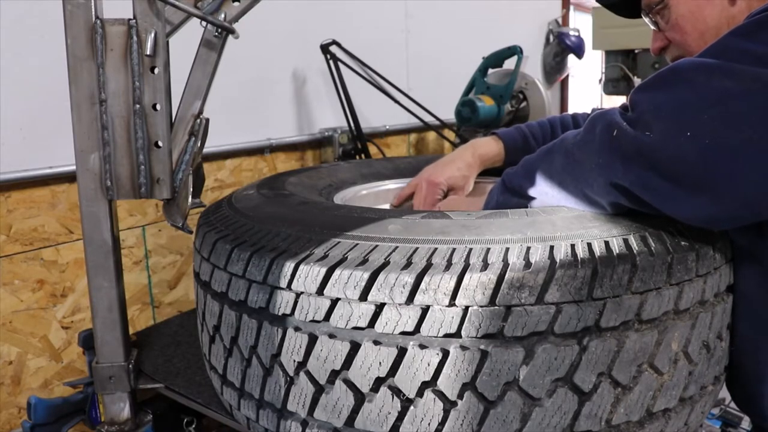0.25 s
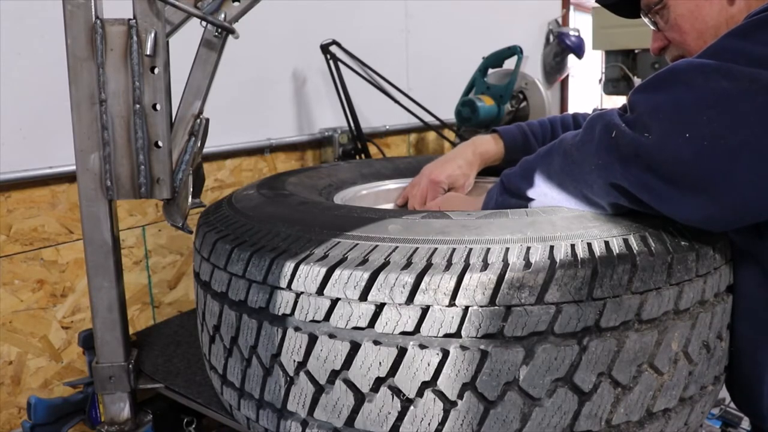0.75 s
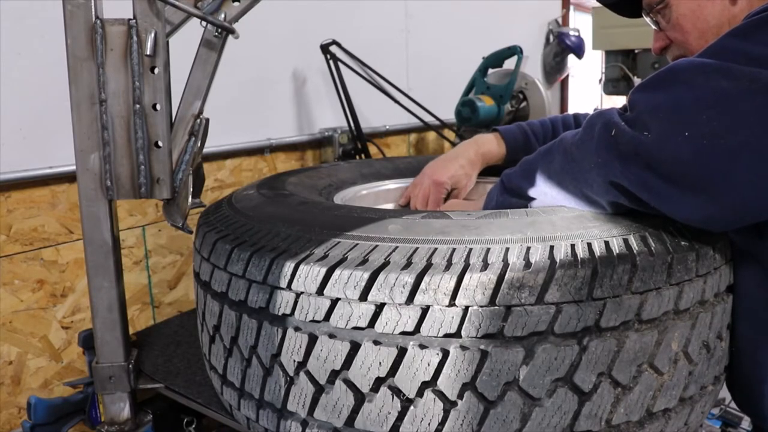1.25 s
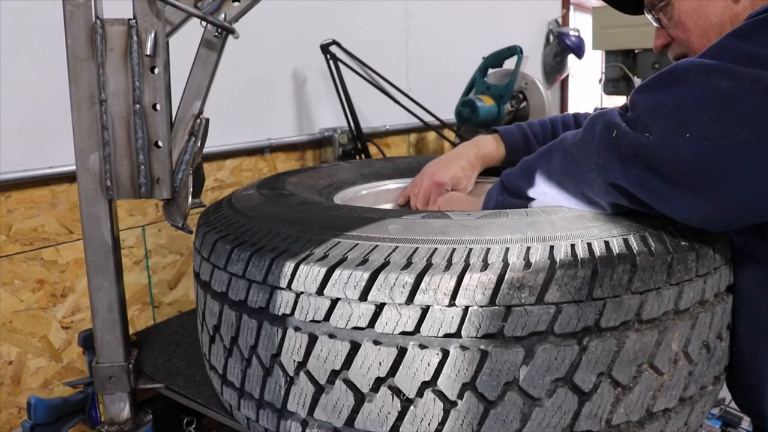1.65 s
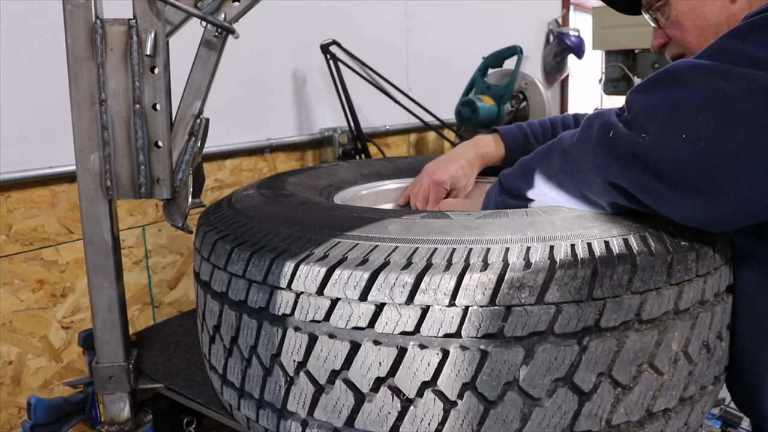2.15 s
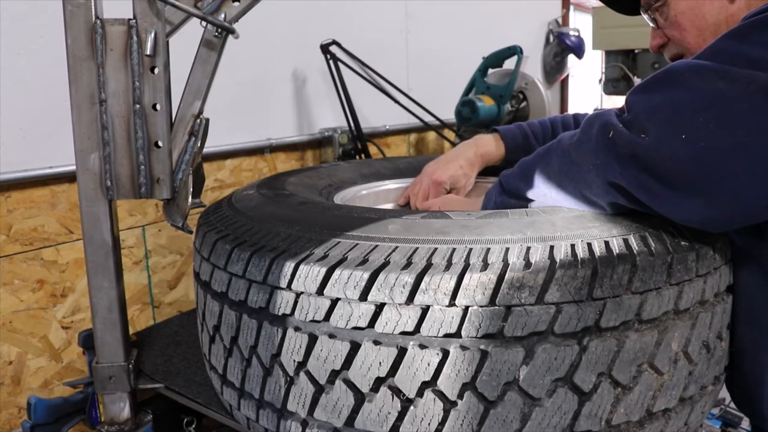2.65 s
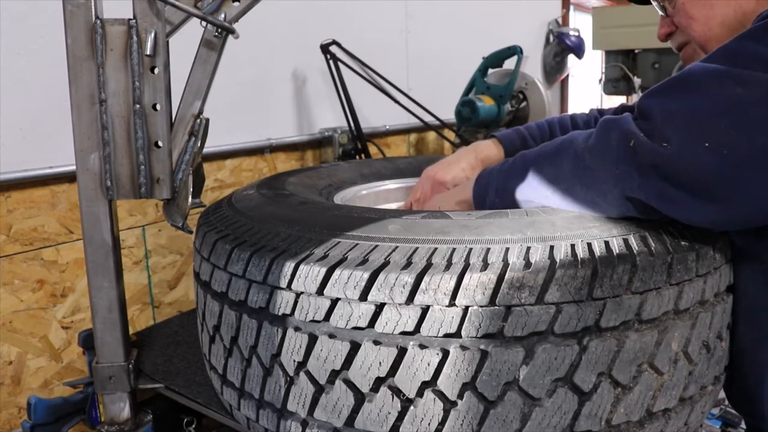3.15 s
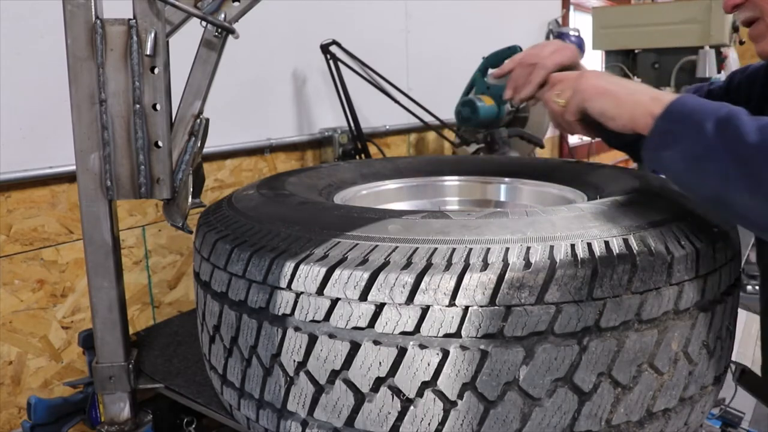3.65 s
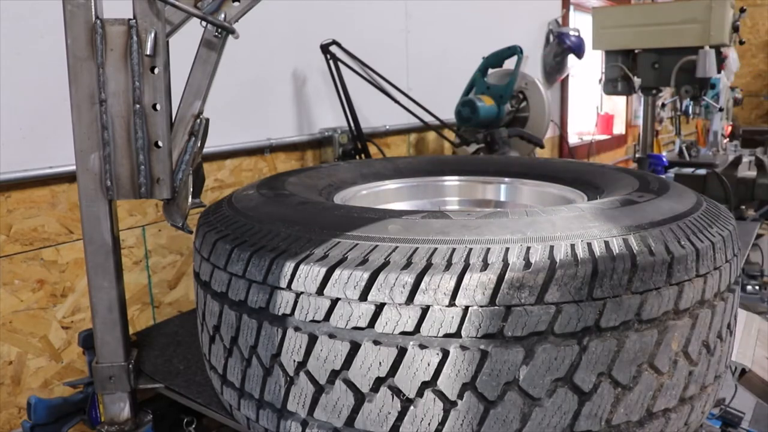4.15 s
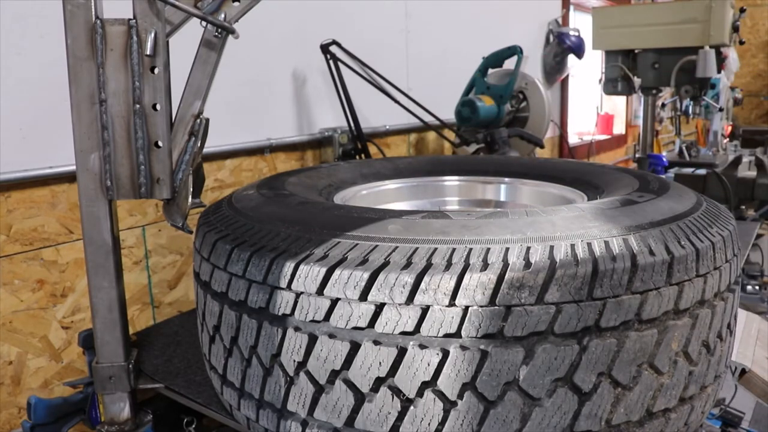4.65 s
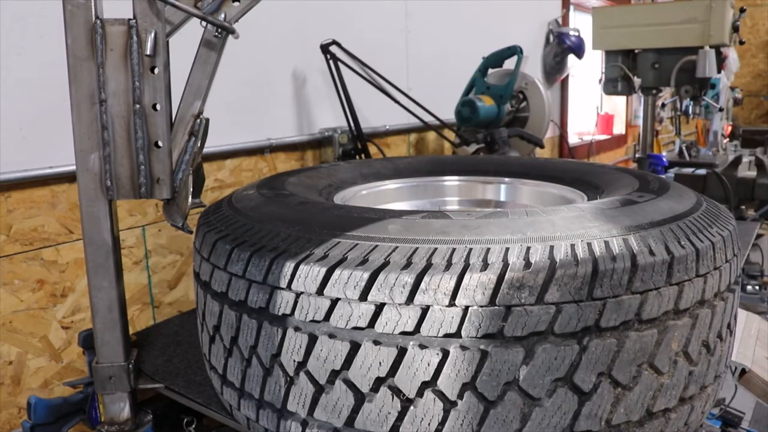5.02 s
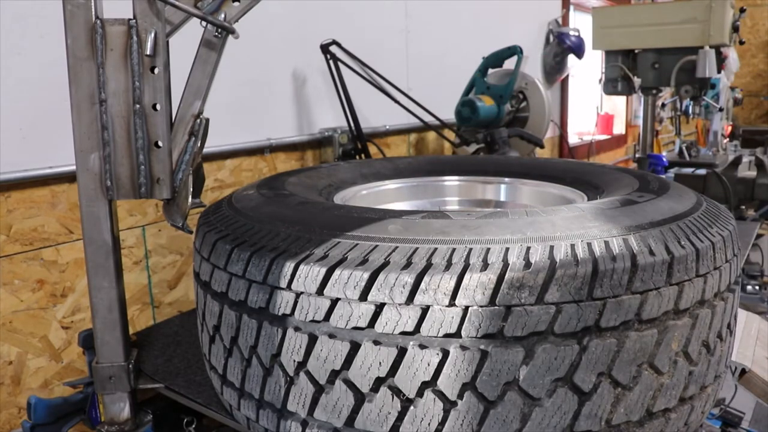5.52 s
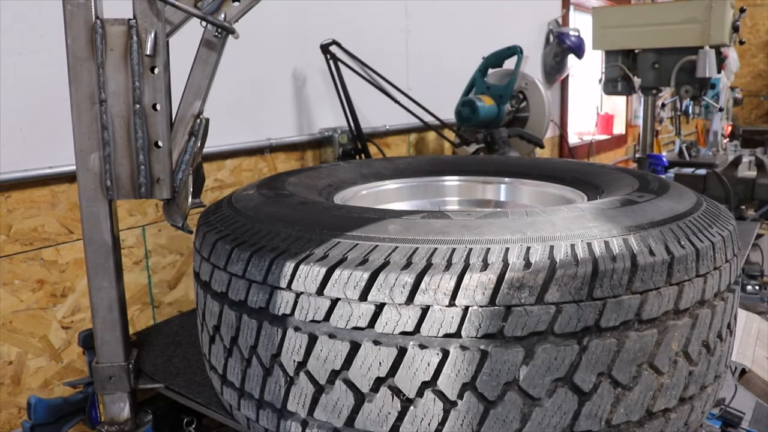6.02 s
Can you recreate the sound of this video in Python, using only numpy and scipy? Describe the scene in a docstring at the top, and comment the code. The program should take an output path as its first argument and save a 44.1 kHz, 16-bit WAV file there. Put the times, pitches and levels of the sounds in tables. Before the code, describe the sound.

In a small workshop, air leaks from the valve of a large truck tire, a faint, uneven hiss with little spurts as fingers loosen the core. The leak grows, then suddenly jumps to a loud hiss, and the gap gives one short squeal. After a breathy gust as the hand lifts away, the air blows freely in a bright, steady hiss over a faint low hum from the hollow tire.

```python
"""Deflating a truck tire

In a small workshop, air leaks past the fingers that unscrew the valve core and escapes in spurts.
The core comes loose, the flow jumps and the narrow gap squeals once. The hand lifts away
and the jet blows freely, a loud steady hiss over the hum of the hollow tire. Mono."""
import sys
import numpy as np
from scipy import signal
from scipy.fft import rfft, irfft
from scipy.io import wavfile
from scipy.ndimage import uniform_filter1d

SR = 44100
rng = np.random.default_rng(int(sys.argv[2]) if len(sys.argv) > 2 else 0)


def pcm_store(signal):
    """Save signal as 16-bit PCM."""
    levels = np.round(np.clip(np.atleast_2d(signal), -1, 1) * 32767)
    wavfile.write(sys.argv[1], SR, levels.astype(np.int16).T)


N = 276948
TIME = np.arange(N) / SR
STFT = dict(nperseg=2048, noverlap=1536)
BINS_HZ = np.fft.rfftfreq(2048, 1 / SR)
FRAMES_S = np.arange(N // 512 + 3) * 512 / SR

LOOSE_S, LOOSE_RISE_S, FULL_FLOW_DB = 2.622, 0.019, -17.5  # core comes loose
AWAY_S, AWAY_LENGTH_S = 3.35, 0.3  # hand leaves the wheel dish
# stem and wheel dish resonances, hand on the valve: f/Hz, width/Hz, gain/dB
COVERED_MODES = [(619.4, 23, 23), (742, 27, 25), (2247, 54, 6.5), (2740, 110, 7), (3380, 100, 5),
                 (4100, 79, 7.5), (4374, 155, 7.5), (7035, 350, 11), (7580, 45, 15), (8680, 200, 5.5),
                 (10460, 155, 7), (11060, 350, 2.5), (12500, 2100, 3), (14466, 422, -7)]


def gain_of(db):
    """dB to amplitude."""
    return 10 ** (np.asarray(db) / 20)


def unit_rms(x):
    """Scale to rms 1."""
    return x / np.sqrt(np.mean(x ** 2) + 1e-20)


def curve(points, t):
    """Linear interpolation over time."""
    return np.interp(t, *np.transpose(points))


def spectrum(points, hz=BINS_HZ):
    """Interpolation over log frequency."""
    f, value = np.transpose(points)
    return np.interp(np.log(hz + 1), np.log(f + 1), value)


def peaks_db(modes):
    """Summed resonance curves, per bin."""
    return sum(db / (1 + (2 * (BINS_HZ - hz) / width_hz) ** 2) for hz, width_hz, db in modes)


def ramp(t, centre_s, length_s):
    """Linear rise from 0 to 1."""
    return np.clip(.5 + (t - centre_s) / length_s, 0, 1)


def swell(centre_s, length_s):
    """Smooth bump of height 1."""
    offset_s = abs(TIME - centre_s)
    return np.exp(-(2 * offset_s / length_s) ** 3) * (offset_s < 2 * length_s)


def eddies(frames, bins):
    """Random patches over time and frequency, rms 1."""
    field = rng.standard_normal((len(FRAMES_S), len(BINS_HZ)))
    return unit_rms(uniform_filter1d(uniform_filter1d(field, frames, 0), bins, 1))


def noise(colour_db):
    """Noise with a steady or moving spectrum, rms 1."""
    real, imag = rng.standard_normal((2, len(FRAMES_S), len(BINS_HZ)))
    spectra = (real + 1j * imag) * gain_of(colour_db)
    return unit_rms(signal.istft(spectra.T, **STFT)[1][:N])


def workshop(air_db=-55, hum_db=-65, hum_hz=120, sink_db=5):
    """Room noise and faint mains hum; both sink once the hiss is loud."""
    # room noise: f/Hz, level/dB
    room_colour = [(20, -10), (55, -0.5), (90, -5), (160, -4.5), (300, -4), (420, -8), (600, -9),
                   (1500, -19), (8000, -25.5)]
    air = gain_of(air_db) * noise(spectrum(room_colour))
    hum = gain_of(hum_db) * unit_rms(np.sin(2 * np.pi * hum_hz * TIME))
    loud = curve([(2.55, 0.023), (2.8, 1)], TIME)
    return (air + hum) * gain_of(-sink_db * loud)


def flow_db():
    """Outflow: a growing leak, then full once the core is loose."""
    # leak past the core: t/s, level/dB
    leak = [(0, -41), (.76, -40.5), (.84, -38), (1.15, -36), (1.5, -32.5), (1.72, -33), (2.0, -33),
            (2.07, -37), (2.555, -31), (2.57, -24)]
    leak_db = curve(leak, TIME)
    return leak_db + (FULL_FLOW_DB - leak_db) * ramp(TIME, LOOSE_S, LOOSE_RISE_S)


def slips_db():
    """Fingertips slip on the gap, passing more air or pinching it."""
    # flow changes: t/s, length/s, gain/dB
    slips = [(0.047, 0.21, 4), (0.541, 0.06, 10), (0.85, 0.052, 2.5), (0.948, 0.022, 6.5), (1.193, .05, -3),
             (1.53, 0.27, 3), (2.37, 0.043, 4), (2.425, .03, -3), (2.519, 0.014, 4), (2.65, 0.045, 1.5),
             (2.846, 0.019, -9.5), (2.963, 0.15, -2)]
    return sum(db * swell(s, length_s) for s, length_s, db in slips)


def fingers_db():
    """Moving fingers tune or shade the jet, per frame and bin."""
    # gliding peaks and notches: start/s, end/s, start f/Hz, end f/Hz, width/Hz, gain/dB
    glides = [(-.05, .14, 8200, 7740, 1200, 7), (.1, .4, 7900, 7100, 900, 4),
              (0.145, 0.526, 8600, 8500, 700, -3), (.48, .62, 14000, 14000, 4000, 3),
              (.39, 0.606, 6400, 7700, 380, 10), (0.843, 1.35, 7200, 7150, 300, 3),
              (1.15, 1.6, 12500, 13500, 3500, 0.5), (1.37, 2.05, 8600, 9200, 300, 6.5),
              (1.7, 2.02, 11000, 11200, 500, 1), (2.05, 2.4, 14600, 14500, 4000, 4.5),
              (2.4, 3.08, 14800, 14500, 4000, 2.5), (2.1, 2.656, 5460, 5640, 1300, -6),
              (2.594, 3, 6000, 6400, 1020, -9.5), (2.49, 2.63, 3500, 3500, 4000, -4.5),
              (2.992, 3.217, 4400, 4550, 500, 6), (3.005, 3.192, 8340, 7840, 1300, 6)]
    field_db = 0
    for start_s, end_s, from_hz, to_hz, width_hz, db in glides:
        along = np.clip((FRAMES_S[:, None] - start_s) / (end_s - start_s), 0, 1)
        fade = np.minimum(1, 2 * np.sin(np.pi * along))
        field_db += fade * peaks_db([(from_hz + along * (to_hz - from_hz), width_hz, db)])
    return field_db


def palm(t, centre_s=3.243, length_s=0.17):
    """How far the passing palm blocks the jet, 0 to 1."""
    return np.exp(-(2 * (t - centre_s) / length_s) ** 2)


def jet_colour_db(eddy_db=1.2):
    """The jet's spectrum shifts as the core comes out and the hand leaves the wheel dish."""
    # jet squeezed past the core, and free jet: f/Hz, level/dB
    squeezed_colour = [(100, -39), (500, -42), (900, -16.5), (1400, -5), (2100, -13.5), (3000, -10.5),
                       (4400, -11), (6200, -7.5), (7200, -9.5), (9000, -2.5), (11000, -6), (13500, -16.5),
                       (15600, -21.5)]
    free_colour = [(100, -63), (400, -54), (600, -29.5), (900, -27.5), (1200, -22.5), (3000, -16),
                   (4800, -10.5), (6300, -16.5), (8800, -2), (10000, -5), (12000, -15.5), (15600, -20.5)]
    # stem and wheel dish resonances, hand away: f/Hz, width/Hz, gain/dB
    bare_modes = [(736, 130, 8.1), (1130, 120, 3), (1450, 66, 3.3), (1780, 150, 5.1), (2180, 300, 3.1),
                  (2520, 65, 4.5), (2840, 210, 5.4), (3280, 91, 4.7), (3740, 130, 4.4), (4155, 66, 2),
                  (4470, 120, 5.5), (5438, 140, 4), (5740, 80, 3), (7070, 70, 2.4), (7470, 90, 1.7),
                  (8050, 27, 1.1), (8740, 140, 3.2), (9220, 270, 3.4), (10820, 160, 3.8), (12150, 100, 3),
                  (13000, 160, 2.8), (15000, 1500, 8.4)]
    t = FRAMES_S[:, None]
    loose, away = ramp(t, LOOSE_S, LOOSE_RISE_S), ramp(t, AWAY_S, AWAY_LENGTH_S)
    opening = 0.17 * (1 - loose) + 0.33 * (loose - away) + 0.95 * away  # core tight, loose, out
    squeezed_db = spectrum(squeezed_colour) + peaks_db(COVERED_MODES)
    free_db = spectrum(free_colour) + peaks_db(bare_modes)
    base_db = (1 - opening) * squeezed_db + opening * free_db
    roar_db = (2 * (1 - away) - 0.8 * away + 6 * palm(t)) * spectrum([(5000, 0.94), (7500, 0.18)])
    fizz_db = (5 * (1 - away) - 0.5 * away) * spectrum([(10000, 0), (13500, 1)])
    # rim and wall echoes comb the hiss; the comb changes as the hand moves away
    covered_comb, bare_comb = unit_rms(rng.random((2, len(BINS_HZ))) - .5)
    comb = np.sqrt(1 - opening) * covered_comb + np.sqrt(opening) * bare_comb
    ripple_db = comb * spectrum([(1500, 2.7), (5000, 2.25)])
    return base_db + fingers_db() + roar_db + fizz_db + ripple_db + eddy_db * eddies(frames=6, bins=24)


def jet(flutter_db=0.22, palm_shade_db=5.5):
    """Turbulent hiss at the valve; the flow sets the level of its bright band, the rest follows."""
    colour_db = jet_colour_db()
    bright = (BINS_HZ > 6500) & (BINS_HZ < 15500)
    colour_db -= 10 * np.log10((gain_of(colour_db[:, bright]) ** 2).sum(1, keepdims=True))
    total_over_bright = np.sqrt((gain_of(colour_db) ** 2).sum(1).mean())
    flutter = unit_rms(uniform_filter1d(rng.standard_normal(N), size=900))
    level_db = flow_db() + slips_db() - palm_shade_db * palm(TIME) + flutter_db * flutter
    return total_over_bright * noise(colour_db) * gain_of(level_db)


def cupped_hand(cupped_s=0.51, full_db=-31.5, db_per_flow_db=0.58, eddy_db=4.0):
    """The hollow between hand and wheel gives a breathy mid tone that follows the flow."""
    # hollow of the hand: f/Hz, level/dB
    cup_colour = [(200, -54), (450, -28), (620, -11.5), (850, -11.5), (1100, -3.5), (1380, 1.5), (1650, -3),
                  (2000, -17), (3500, -14.5)]
    cupped = ramp(TIME, cupped_s, length_s=0.35) * (1 - ramp(TIME, AWAY_S, AWAY_LENGTH_S))
    level_db = full_db + db_per_flow_db * (flow_db() + slips_db() - FULL_FLOW_DB)
    breath = noise(spectrum(cup_colour) + eddy_db * eddies(frames=4, bins=8))
    return cupped * gain_of(level_db) * breath


def spurts(ring_share=0.44):
    """Short gusts escape as the fingers shift, each ringing the covered wheel dish."""
    # gusts: t/s, length/s, level/dB, centre f/Hz, spread/octaves
    gusts = [(0.963, 0.034, -40, 1380, 0.16), (1.09, .14, -39.5, 1330, 0.3), (1.338, 0.086, -48.5, 696, .4),
             (1.638, 0.027, -34, 1900, 0.7), (2.112, 0.051, -37.5, 1910, 0.81),
             (2.182, 0.021, -42.5, 850, 0.6), (2.383, 0.05, -34.5, 2630, 0.6),
             (2.458, 0.018, -26, 2760, 0.71), (2.992, 0.014, -18, 1320, 0.13),
             (3.216, 0.066, -24.5, 1900, 0.46), (3.247, 0.099, -25.5, 1020, 0.33),
             (3.36, 0.1, -36, 398, 1.1)]
    out, size = np.zeros(N), 16384
    gust_bins_hz = np.fft.rfftfreq(size, 1 / SR)
    for s, length_s, db, hz, spread_oct in gusts:
        octaves = np.log2((BINS_HZ + 1) / hz)
        band_db = 10 * np.log10(np.exp(-.5 * (octaves / spread_oct) ** 2) + 1e-9)
        colour = gain_of(band_db + ring_share * peaks_db(COVERED_MODES))
        gust = irfft(rfft(rng.standard_normal(size)) * np.interp(gust_bins_hz, BINS_HZ, colour))
        out += gain_of(db) * swell(s, length_s) * np.resize(unit_rms(gust), N)
    return out


def thinned(hiss, threshold_db=-4.5, pip_db=6):
    """All but the strongest tones of the hiss dip briefly; the lower ones stand out as pips."""
    # dips: t/s, length/s, depth/dB
    dips = [(2.835, 0.018, 12), (3.419, 0.015, 20), (3.503, 0.0097, 13), (3.737, 0.023, 15.5),
            (3.801, 0.008, 14), (3.887, 0.012, 16), (3.931, 0.015, 15), (4.346, 0.031, 37),
            (4.685, 0.028, 45), (5.457, 0.024, 27), (5.511, 0.015, 9), (5.67, 0.028, 5), (5.961, 0.014, 16),
            (6.254, 0.032, 4.5)]
    hz, _, spectra = signal.stft(hiss, SR, **STFT)
    power = uniform_filter1d(abs(spectra) ** 2, size=3, axis=0)
    threshold = gain_of(threshold_db) ** 2 * power[(hz > 8000) & (hz < 10000)].mean(0)
    strong = 1 / (1 + (threshold / (abs(power) + 1e-16)) ** 6)
    pip_gain = gain_of(pip_db * (hz[:, None] < 6000))
    tones = signal.istft(spectra * strong * pip_gain, **STFT)[1][:N]
    dip_db = sum(depth_db * swell(s, length_s) for s, length_s, depth_db in dips)
    return tones + (hiss - tones) * gain_of(-dip_db)


def squeal(start_db=-20, sag_db_per_s=50, attack_s=0.019, release_s=0.012, jitter=0.03, rasp=0.32):
    """The gap at the loose core flutters unevenly; its overtones sweep through the hand's resonance."""
    # pitch: t/s, f/Hz
    pitch = [(2.92, 738.5), (2.955, 644), (2.97, 560.5), (3.003, 454.5), (3.014, 598.5), (3.055, 746)]
    # resonance of the hand: f/Hz, level/dB
    hand_colour = [(350, -29), (500, -15.5), (690, -6.5), (1000, -5), (1350, 1), (1700, -6), (2100, -10),
                   (2650, -11), (4000, -28)]
    t = TIME[(TIME > pitch[0][0]) & (TIME < pitch[-1][0])]
    hz, age_s = curve(pitch, t), t - t[0]
    wobble, shake = unit_rms(uniform_filter1d(rng.standard_normal((2, len(t))), size=70, axis=1))
    phase = 2 * np.pi * np.cumsum(hz * (1 + jitter * wobble)) / SR
    tone = sum(gain_of(spectrum(hand_colour, k * hz)) * np.sin(k * phase) for k in range(1, 7))
    rough_tone = unit_rms(tone * (1 + rasp * shake))
    gate = np.minimum(1, np.minimum(age_s / attack_s, (t[-1] - t) / release_s))
    envelope = gate * gain_of(start_db - sag_db_per_s * age_s)
    return np.interp(TIME, t, envelope * rough_tone, left=0, right=0)


def tire_hum(full_db=-44, damping_db=14.5, freed_s=3.22):
    """The outflow stirs the ring of air inside the tire, fully once the hand lets go."""
    # tire cavity: f/Hz, level/dB
    cavity_colour = [(30, -36), (70, -40), (102, -23.5), (117, 12.5), (134, 0.5), (148, -6.5), (205, -10),
                     (315, -5.5), (420, -6.5), (520, -8.5), (800, -28), (2000, -52)]
    held = 1 - ramp(TIME, freed_s, length_s=0.055)
    level_db = full_db + flow_db() - FULL_FLOW_DB - damping_db * held
    return gain_of(level_db) * noise(spectrum(cavity_colour))


def scene():
    """Escaping air and room, alike in both channels."""
    mono = thinned(jet() + cupped_hand() + tire_hum()) + spurts() + squeal() + workshop()
    return np.array([mono, mono])


def record(dry):
    """Steep low-pass at 15.8 kHz."""
    lowpass = signal.firwin(601, 15800, window=("kaiser", 9), fs=SR)
    return signal.oaconvolve(dry, lowpass[None], "same")


dry = scene()
out = record(dry)
pcm_store(out)
```